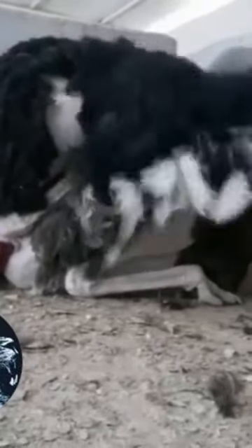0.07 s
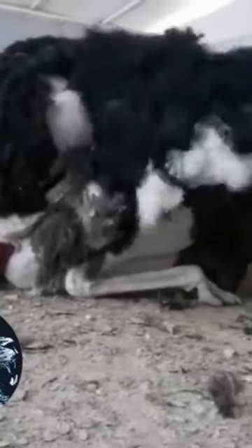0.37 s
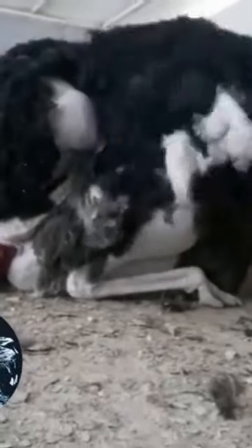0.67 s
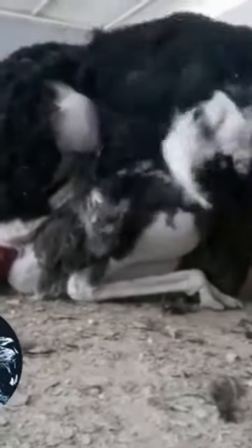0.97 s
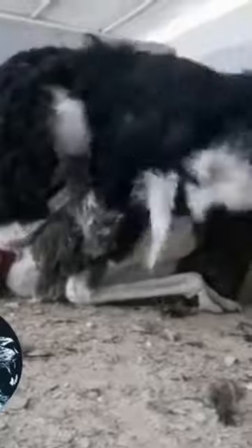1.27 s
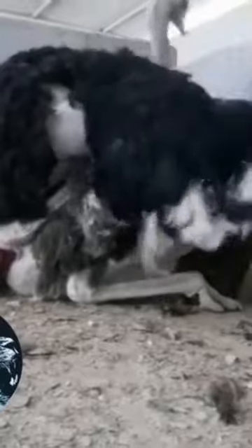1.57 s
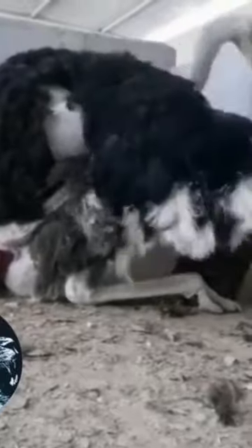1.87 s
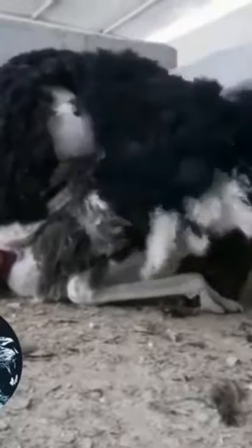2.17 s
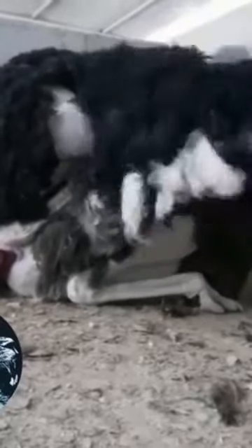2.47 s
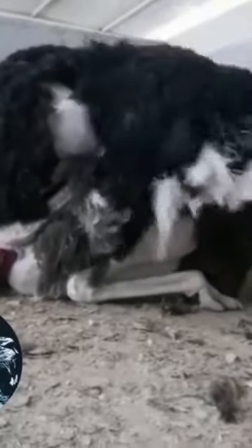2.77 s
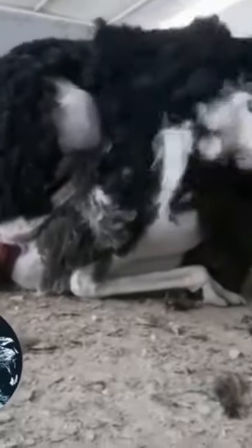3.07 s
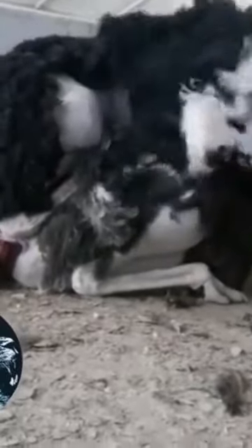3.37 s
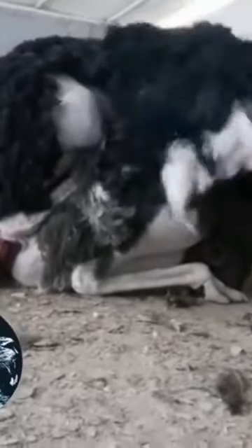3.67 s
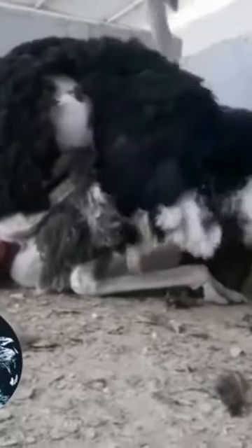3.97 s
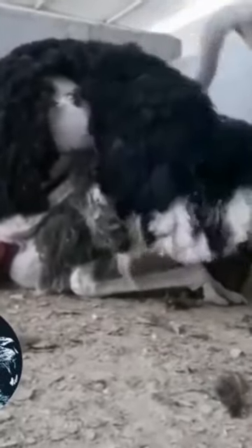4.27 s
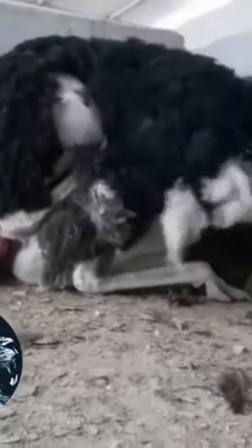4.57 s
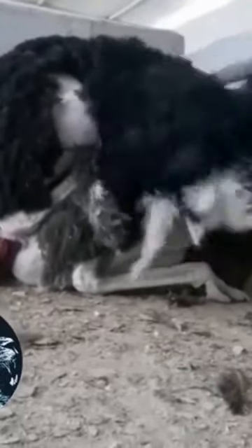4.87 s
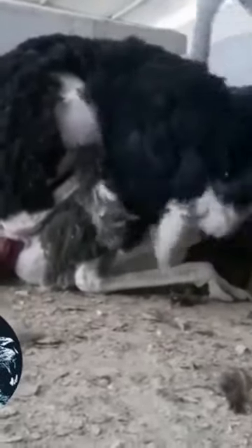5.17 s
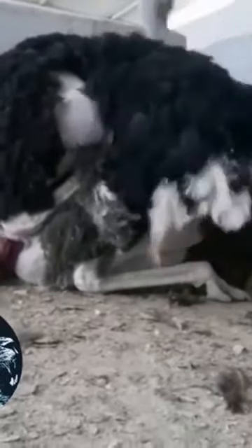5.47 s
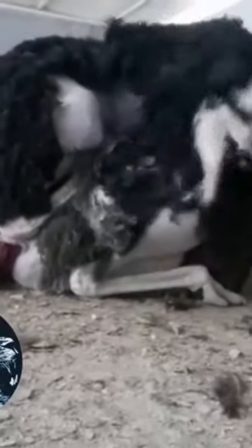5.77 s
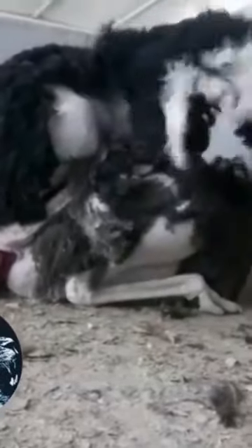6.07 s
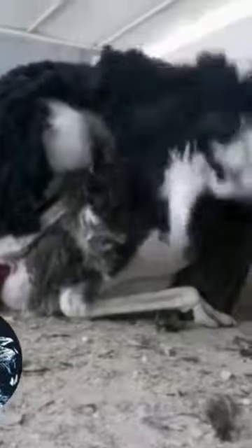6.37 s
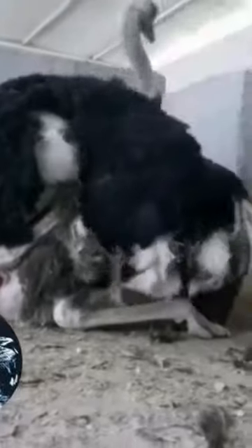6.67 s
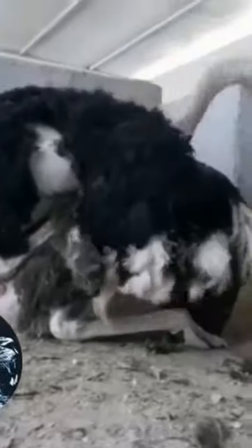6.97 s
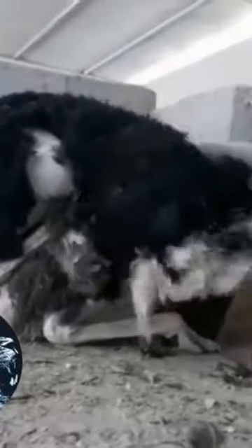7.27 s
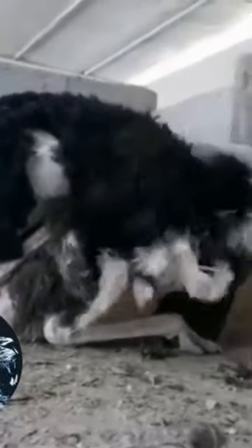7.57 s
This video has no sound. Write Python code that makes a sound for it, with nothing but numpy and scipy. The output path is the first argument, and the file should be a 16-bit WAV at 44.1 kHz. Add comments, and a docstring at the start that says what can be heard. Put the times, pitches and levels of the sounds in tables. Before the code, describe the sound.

A male ostrich roars four times close to the microphone in a quiet covered pen. Each roar is a deep, pulsing boom with wheezy air, and the first three sag in pitch into a rattling groan. Between them the bird draws a thin, hissing breath. Its body bumps the dusty ground, with small stone clacks and faint feather rustle, mostly before the last roar, which is cut short.

```python
"""In a covered pen, on dusty ground, a male ostrich crouches close by and roars four times.
Each roar is a deep pulse tone from the syrinx, radiated by the inflated neck while turbulent air
rushes through the throat; as the pressure falls, the pitch sags and the tone becomes a rattle.
Between roars the bird draws air with a thin hiss. Its body bumps the ground, stones clack and
feathers rustle, and the pen returns short echoes over a quiet background."""
import sys
import numpy as np
from scipy import signal
from scipy.fft import rfft, irfft, next_fast_len
from scipy.io import wavfile
from scipy.ndimage import uniform_filter1d

SR = 44100
rng = np.random.default_rng(int(sys.argv[2]) if len(sys.argv) > 2 else 0)


def put_to_file(sound):
    """Save the sound as 16-bit audio at rate SR, in the file named by the first command-line argument."""
    columns = np.atleast_2d(sound).T  # one column per channel
    safe = np.clip(columns, -1, 1)
    whole_steps = np.round(safe * 32767)
    wavfile.write(sys.argv[1], SR, whole_steps.astype(np.int16))


N = 344862
TIME = np.arange(N) / SR

# Levels are relative: each source adds its own gains.
# course of each roar: t/s, pitch/Hz, fundamental/dB, boom at 100-200 Hz/dB, growl above it/dB
ROARS = [
    [(.02, 64.3, -54, -52.5, -81), (.07, 65.3, -50, -44.5, -40.5), (.12, 77.8, -39, -32, -35.5),
     (.17, 76.8, -39, -26, -31), (.235, 89.5, -28, -24, -29), (.32, 89.7, -29.5, -25.5, -28.5),
     (.375, 84.5, -33.5, -30, -34.5), (.46, 81.3, -40, -31.5, -37), (.52, 80, -45.5, -36.5, -32),
     (.665, 80.14, -49, -30, -31.5), (.725, 76.5, -56, -45.5, -36), (.775, 78.7, -53, -40, -33.5),
     (.815, 80.5, -46, -25, -32.5), (.89, 78.7, -50, -31, -31), (.98, 82.1, -47, -24.5, -35.5),
     (1.14, 82.15, -46.5, -24.5, -35.5), (1.3, 81.5, -45.5, -26.5, -34.5), (1.38, 78.2, -47, -28.5, -34),
     (1.46, 81, -43, -28.5, -32.5), (1.53, 68.16, -53, -34, -44), (1.66, 64.8, -58, -34.5, -38.5),
     (1.73, 60.33, -57, -44, -53.5), (1.79, 56.4, -69, -60.5, -68)],
    [(2.42, 65, -60, -50.5, -63), (2.47, 68.75, -50.5, -49.5, -40.5), (2.53, 77.6, -36.5, -33.5, -35),
     (2.6, 84.5, -35, -24.5, -30.5), (2.71, 84.35, -34.5, -28.5, -32.5), (2.775, 82.3, -36.5, -30.5, -37),
     (2.84, 76, -48.5, -45, -39), (2.92, 77.76, -42, -39, -35.5), (2.98, 79.84, -46, -44, -33.5),
     (3.06, 76.5, -50, -35, -34.5), (3.2, 72.1, -62, -30, -39), (3.29, 71.9, -56, -31.5, -43),
     (3.41, 67.54, -61, -29.5, -40), (3.5, 64.27, -53, -36, -42), (3.6, 63.2, -49, -30, -48.5),
     (3.68, 53.8, -64, -43.5, -47.5), (3.75, 52.44, -61, -39, -61), (3.83, 52.55, -63, -53, -63)],
    [(4.67, 56, -57, -66, -66), (4.73, 60.7, -63, -39.5, -47.5), (4.78, 65, -46, -42, -41.5),
     (4.82, 80.6, -35, -27.5, -31.5), (4.91, 89.5, -27, -23.5, -31.5), (5, 88.26, -29, -25, -31),
     (5.09, 86.9, -30.5, -24.5, -32.5), (5.17, 83.57, -31, -23.5, -30.5),
     (5.28, 84.93, -31.5, -26.5, -32.5), (5.33, 79.75, -38.5, -29, -34), (5.45, 74.57, -39.5, -37.5, -38.5),
     (5.53, 66.5, -55, -40, -41), (5.66, 67.73, -59, -42, -41.5), (5.83, 63.4, -68, -43, -48),
     (5.98, 53.9, -62.5, -38.5, -51.5), (6.04, 48.84, -71, -43.5, -57), (6.15, 47.25, -61, -52, -72.5)],
    [(7.3, 54.9, -69, -47.5, -52), (7.35, 55.86, -60, -41, -53.5), (7.4, 66.9, -46, -46, -43),
     (7.46, 74.7, -38.5, -27.5, -35), (7.51, 78.4, -37, -28.5, -33), (7.58, 83.63, -29.5, -27, -35),
     (7.68, 81.66, -32.5, -25.5, -34), (7.74, 82.6, -30, -25.5, -37), (7.85, 81.45, -37, -25, -34)],
]
# radiation response of the neck for partials 2-5: f/Hz, level/dB
NECK_RESPONSE = [(100, -13.5), (122, -5.5), (140, 0), (165, 2.43), (200, 0.1), (250, 0.5), (290, -2.5),
                 (325, -1), (352, -0.5), (385, -12.5), (410, -20.5), (460, -25)]
# spectral envelope of the higher partials: f/Hz, level/dB
OVERTONE_SPECTRUM = [(300, -12.5), (490, 2.5), (545, 1.5), (605, -7), (690, 3), (770, -3), (840, -12.5),
                     (950, -18), (1060, -7), (1140, -3.5), (1350, -21), (1600, -7.5), (1900, -22),
                     (2200, -16.5)]
# noise of the rattling neck sac: f/Hz, level/dB
SAC_SPECTRUM = [(30, -29), (70, -3.5), (150, 0.5), (250, 1.5), (350, 8.5), (440, -16.5), (620, -28.5),
                (1000, -54)]
# full inflation early in each roar: start/s, duration/s, fourth partial lift/dB, overtone lift/dB
FULL_NECK = [(.159, 0.26, -3, -2), (2.533, 0.51, -3.5, 0), (4.809, 1, -1.5, 0.5), (7.529, .45, -5.5, 5.5)]
# passing resonances of the bending neck: start/s, end/s, centre/Hz, lift/dB
MOANS = [(0.31, 0.442, 767, 15), (0.389, 0.702, 411, 10.5), (0.173, .4, 525, 6.5), (0.483, 0.807, 540, 6),
         (2.576, 2.8, 748, 12.5), (2.548, 2.78, 1090, 5.5), (2.554, 2.777, 1188, 7),
         (2.62, 2.835, 476.5, 16), (2.734, 3.016, 406, 11.5), (2.843, 3.048, 535, 8.5),
         (3.107, 3.361, 364.2, 6.5), (3.15, 3.361, 701.3, 5), (3.417, 3.624, 323.3, 1),
         (4.86, 4.959, 816, 9), (4.851, 5.121, 713, 4.5), (4.947, 5.14, 1130, 6.5),
         (5.091, 5.217, 744.4, 10.5), (5.099, 5.323, 505.8, 2.5), (5.633, 5.92, 316, 12.5),
         (7.529, 7.899, 416, 10.5), (7.424, 7.9, 502.5, 5), (7.551, 7.9, 830, 5.5)]
# wobble of the sac in the first roar: start/s, end/s, rate/Hz, slowing/(Hz/s), depth/1
WOBBLE = (0.81, 1.7, 8.27, 6.1, 0.22)
# air blown out with each roar: t/s, throat level/dB, beak level/dB, wheeze centre/Hz
EXHALATIONS = [
    [(0.0, -53, -62, 1873), (0.034, -47.5, -62, 1761), (0.09, -53, -70, 1834), (0.262, -48.5, -63.5, 1837),
     (0.486, -48.5, -60.5, 1726), (0.658, -45.5, -62.5, 1948), (0.856, -51, -61.5, 1784),
     (0.952, -47.5, -63.5, 2001), (1.018, -51, -69, 1939), (1.044, -51.5, -61.5, 1825),
     (1.556, -50.5, -69, 1772), (1.616, -51, -63.5, 1944), (1.82, -59, -80, 1854)],
    [(2.42, -55, -74, 1830), (2.475, -50.5, -71, 1717), (2.586, -50.5, -64.5, 1788),
     (2.856, -48.5, -64.5, 1698), (2.902, -48, -58.5, 1995), (2.996, -48, -63, 1740),
     (3.102, -48, -63, 2000), (3.242, -46, -63.5, 1805), (3.534, -60.5, -73.5, 1920),
     (3.582, -51, -64.5, 1850), (3.628, -54.5, -71, 1774), (3.82, -67, -75, 1842)],
    [(4.68, -53, -78, 1812), (4.692, -57, -66, 1714), (4.73, -58.5, -82, 1748), (4.814, -50, -65, 1795),
     (5.174, -50.5, -61.5, 1825), (5.23, -53.5, -65.5, 1710), (5.424, -45.5, -62, 1793),
     (5.508, -52, -69.5, 1820), (5.636, -52.5, -69, 1688), (6.098, -61.5, -71, 1829), (6.2, -88, -84, 1960)],
    [(7.33, -73, -58, 1863), (7.38, -56.5, -73, 1848), (7.44, -45.5, -65, 1658), (7.56, -46.5, -64, 1826),
     (7.7, -48, -60.5, 1670), (7.87, -48.5, -60, 1676)],
]
# turbulence in the throat: f/Hz, level/dB
THROAT_SPECTRUM = [(300, -12.5), (520, -0.5), (610, -5), (720, -3.5), (860, -12), (970, -7), (1120, -4.5),
                   (1300, -3.5), (1600, -0.5), (2130, -2), (2400, -7), (3200, -18.5), (4200, -33.5),
                   (7000, -55)]
# hiss at the beak: f/Hz, level/dB
BEAK_SPECTRUM = [(1800, -25.5), (2900, 5), (3700, 3.5), (4500, 8.5), (5300, -0.5), (6500, -7.5),
                 (8000, -15.5), (10000, -33), (13000, -28.5)]
# catches in the throat: start/s, end/s, first centre/Hz, last centre/Hz, level/dB
RASPS = [(.11, .43, 1680, 1600, -54), (.19, .37, 2130, 1975, -52.5), (.56, .72, 1850, 1777, -52.5),
         (.59, .81, 2150, 1910, -52), (.87, 1.01, 2100, 2122, -62), (1.08, 1.43, 1880, 1857, -60.5),
         (1.5, 1.67, 2200, 2105, -58.5), (2.48, 2.62, 1620, 1693, -53.5), (2.59, 2.82, 2130, 2095, -59.5),
         (2.66, 2.77, 1650, 1530, -55), (2.81, 2.93, 1540, 1868, -48.5), (2.87, 2.95, 2050, 2130, -49.5),
         (2.97, 3.05, 1750, 1746, -45.5), (2.99, 3.05, 2080, 2066, -47), (3.07, 3.16, 2120, 2100, -51),
         (3.36, 3.47, 2060, 2078, -58), (4.88, 5.24, 1950, 1896, -57), (5.31, 5.49, 1680, 2044, -58),
         (5.59, 5.74, 1670, 1790, -53), (7.45, 7.6, 1680, 2019, -61), (7.6, 7.82, 1640, 1662, -57.5),
         (7.72, 7.82, 1950, 1850, -53), (7.55, 7.82, 2950, 2870, -63)]
# air drawn in between roars: start/s, end/s, attack/s, hold/s, level/dB, fade/(dB/s)
INHALATIONS = [(1.822, 2.46, 0.071, 0.038, -54, 18), (3.921, 4.7, 0.091, 0.019, -51, 36.5),
               (6.383, 7.08, 0.1, 0.22, -58, 60), (7.225, 7.45, 0.057, .02, -54, 25)]
# noise of the indrawn air: f/Hz, level/dB
INTAKE_SPECTRUM = [(80, -13), (170, -3), (380, 0.5), (560, -15.5), (950, -14.5), (1200, -3), (1450, -1.5),
                   (1850, 0.5), (2100, 3.5), (2450, -19.5), (3050, -9), (3700, -23), (4600, -21),
                   (7000, -56)]
# impacts of body and legs on the ground: t/s, thud level/dB, knock level/dB
BUMPS = [(3.688, -51, -55.5), (3.847, -47, -57), (4.129, -46, -50), (4.376, -53.5, -54.5),
         (4.568, -63, -55.5), (6.337, -52, -63), (6.435, -46, -49), (6.53, -49, -64), (6.682, -55, -61),
         (6.878, -75, -73), (7.298, -37, -48.5)]
# dull push on the soil: f/Hz, level/dB
THUD_SPECTRUM = [(30, -18), (70, -6), (150, 2), (250, 3), (350, 3.5), (440, -15.5), (620, -28), (1000, -53)]
# sandy knock: f/Hz, level/dB
KNOCK_SPECTRUM = [(250, -0.5), (480, 11.5), (750, 8), (1100, -4), (1600, -4), (2600, -9), (5000, -43.5)]
# small stones clacking under the bird: t/s, level/dB
CLACKS = [(4.134, -51), (4.377, -47), (6.249, -38.5), (6.436, -40), (7.299, -39.5)]
# soft, deep thumps: t/s, level/dB, f/Hz
THUMPS = [(6.654, -38.5, 146), (6.71, -39, 92), (6.784, -48, 85), (6.972, -53, 144.1)]
# stiff wing quills scraping: t/s, level/dB, centre/Hz
SCRAPES = [(0.014, -47.5, 2550), (0.6254, -50.5, 3420), (1.045, -56, 4897), (2.8948, -53, 4395),
           (3.2165, -51.5, 2950), (3.5737, -58, 3848), (4.473, -60, 3427), (5.99, -72, 6524),
           (6.14, -66, 2788), (6.243, -67, 3370), (6.371, -63, 2520), (7.256, -65, 4180),
           (7.295, -67, 4467), (7.325, -63, 2906), (7.67, -56, 5000)]
# rustle of the feathers as the bird sways: t/s, level/dB
RUSTLE = [(1.6, -62.5), (2.1, -73), (3, -66.5), (4.3, -66), (6.25, -66), (6.6, -68.5), (7.1, -85),
          (7.35, -62.5)]
# reflections from ground, walls and roof: delay/s, level/dB
ECHOES = [(.0031, -30.5), (.0074, -14), (0.0093, -13), (0.017, -28), (0.024, -16.5), (0.034, -20)]
# quiet air of the pen: f/Hz, level/dB
PEN_SPECTRUM = [(32, -39), (55, -0.5), (125, 5.5), (249, 0.5), (554, -8.5), (712, -8), (959, -12),
                (1230, -9.5), (1510, -16.5), (1740, -10), (2450, -13), (4540, -21), (9230, -32.5),
                (13000, -34.5)]


def roar(scatter_rad=0.3, smear_rad=0.91, rattle_db=-19, slack_rattle_db=18, overtone_db=-26,
         slack_dull_db=3, flutter_db=2, base_sway=0.17, groan_sway=0.28, third_sway=0.36, sway_hz=17):
    """Source and filter: the neck sac radiates the syrinx's harmonics. Returns sound and pulse phase."""
    gate, hz, fundamental_db, boom_db, growl_db = controls(ROARS, fade_s=0.02)
    fourth_db, bright_db = inflation()
    # at low pressure the membranes go slack and beat unevenly
    slack = np.interp(hz, [55, 75], [1, 0])
    # full pressure gives a high pitch and crisp pulses; below it they blur into a groan
    blur = np.interp(uniform_filter1d(hz, SR // 6), [80, 85], [1, 0])
    waver = (.004 + .005 * blur) * walk(26) + .022 * slack * walk(60)
    stumble_rad = (.025 + .03 * blur) * walk(80)
    shimmer_db = .5 + .4 * blur + .6 * slack
    even_phase = 2 * np.pi * np.cumsum(hz * (1 + waver)) / SR
    phase = even_phase + stumble_rad
    wobbling_db = growl_db + wobble()
    boom = undb(fundamental_db + shimmer_db * walk(45)) * np.cos(phase)
    for k in range(2, 6):
        growl_share = np.interp(k * hz, [195, 222], [0, 1])
        drive_db = (1 - growl_share) * boom_db + growl_share * wobbling_db
        db = drive_db + colour_db(NECK_RESPONSE, k * hz) + moans(k * hz) + (k == 4) * fourth_db
        # the skin of the sac trembles, so each partial sways in strength and phase, the third most
        depth = base_sway + (third_sway if k == 3 else groan_sway) * (slack if k == 2 else np.sqrt(blur))
        sway = (1 + depth * (walk(sway_hz) + 1j * walk(sway_hz))) / np.sqrt(1 + 2 * depth ** 2)
        # the sac rings on after each pulse, which spreads the partials in time
        lag_rad = np.interp(k * hz, [170, 350], [0, .9]) + smear_rad * blur * (k - 3) ** 2
        partial = np.real(sway * np.exp(1j * (k * phase - lag_rad)))
        boom += undb(db + shimmer_db * np.sqrt(k / 2) * walk(45)) * partial
    buzz = np.zeros(N)
    for k in range(6, 24):
        db = colour_db(OVERTONE_SPECTRUM, k * hz) + moans(k * hz) + flutter_db * walk(12)
        buzz += undb(db) * np.cos(k * even_phase + rng.uniform(0, 2 * np.pi) + scatter_rad * walk(35))
    buzz *= undb(growl_db + overtone_db + bright_db - slack_dull_db * slack)
    # flapping membranes rattle the sac in ragged bursts
    bursts = undb(slack_rattle_db * slack) * (1 + .6 * np.cos(phase))
    rattle = undb(growl_db + rattle_db) * bursts * noise(SAC_SPECTRUM)
    return gate * (np.sqrt(2) * (boom + buzz) + rattle), phase


def inflation(inflate_s=0.023):
    """Radiation efficiency: the full neck shifts the levels of the fourth partial and overtones, in dB."""
    lifts = sum(np.outer(dbs, (TIME > s) & (TIME < s + length_s)) for s, length_s, *dbs in FULL_NECK)
    return uniform_filter1d(lifts, int(inflate_s * SR), axis=1)


def moans(hz, width_hz=42, ease_s=.05):
    """Resonance: the lift in dB that makes a partial moan as it meets a mode of the bending neck."""
    lift = np.zeros(N)
    for start_s, end_s, centre_hz, db in MOANS:
        now = slice(int(start_s * SR), int(end_s * SR))
        held = np.clip(np.minimum(TIME[now] - start_s, end_s - TIME[now]) / ease_s, 0, 1)
        lift[now] += db * held * np.exp(-((hz[now] - centre_hz) / width_hz) ** 2)
    return lift


def wobble():
    """Beating: the wobbling sac gives the growl ever slower swells and dips, in dB."""
    start_s, end_s, rate_hz, slowing_hz_per_s, depth = WOBBLE
    t = TIME - start_s
    beat = abs(1 + depth * np.exp(2j * np.pi * (rate_hz - slowing_hz_per_s * t / 2) * t))
    gate = uniform_filter1d(1. * ((TIME > start_s) & (TIME < end_s)), SR // 20)
    return 20 * np.log10(beat) * gate


def blown_air(phase, throb=0.19, whistle_hz=4400, flicker_db=1.47, gust_db=0.76):
    """Turbulence, pulsed by the syrinx, excites drifting resonances in the throat and at the beak."""
    gate, throat_db, beak_db, wheeze_hz = controls(EXHALATIONS, fade_s=0.12)
    throat = undb(-3) * noise(THROAT_SPECTRUM)
    throat += undb(-12) * resonance(wheeze_hz * (1 + .045 * walk(14)), width_hz=170)
    beak = noise(BEAK_SPECTRUM)
    beak += undb(-8) * resonance(whistle_hz * (1 + .047 * walk(5.3)), width_hz=260)
    throat *= undb(throat_db + flicker_db * walk(40))
    beak *= undb(beak_db + flicker_db * walk(45))
    return gate * undb(gust_db * walk(15)) * (1 + throb * np.cos(phase)) * (throat + beak)


def rasps(phase, width_hz=110, ease_s=0.027, throb=0.5, gain_db=-1):
    """Amplitude modulation: the syrinx chops a narrow, gliding resonance where the throat catches."""
    out, ring = np.zeros(N), ringing(width_hz)
    for row, (start_s, end_s, first_hz, last_hz, db) in enumerate(RASPS):
        t = TIME[(TIME > start_s) & (TIME < end_s)]
        hz = np.interp(t, [start_s, end_s], [first_hz, last_hz])
        held = np.clip(np.minimum(t - start_s, end_s - t) / ease_s, 0, 1)
        amplitude = np.roll(ring, row * SR // 3)[:len(t)]
        band = unit(np.real(amplitude * np.exp(2j * np.pi * np.cumsum(hz) / SR)))
        add(out, start_s, undb(db + gain_db) * held * band)
    return out * (1 + throb * np.cos(phase))


def drawn_air(glottis_hz=1870, release_s=0.17, flicker_db=2.0):
    """Flow through a constriction: the narrow glottis hisses as the bird refills."""
    air = undb(-2) * noise(INTAKE_SPECTRUM) + undb(-7) * resonance(glottis_hz, width_hz=260)
    flow = np.zeros(N)
    for start_s, end_s, attack_s, hold_s, db, fade_db_per_s in INHALATIONS:
        opening = np.clip((TIME - start_s) / attack_s, 0, 1) * np.clip((end_s - TIME) / release_s, 0, 1)
        fading_s = np.maximum(TIME - start_s - attack_s - hold_s, 0)
        flow += opening * undb(db - fade_db_per_s * fading_s)
    return flow * undb(flicker_db * walk(30)) * air


def bumps(rise_s=0.0008, knock_decay_s=0.036, thud_gain_db=-1, knock_gain_db=2):
    """Impact noise: each contact with the ground gives a dull thud and a shorter, sandy knock."""
    out, t = np.zeros(N), TIME[:SR // 4]
    fade = np.exp(-t / knock_decay_s)
    for s, thud_db, knock_db in BUMPS:
        thud = undb(thud_db + thud_gain_db) * fade ** 0.61 * noise(THUD_SPECTRUM, len(t))
        knock = undb(knock_db + knock_gain_db) * fade * noise(KNOCK_SPECTRUM, len(t))
        add(out, s, (1 - np.exp(-t / rise_s)) * (thud + knock))
    return out


def clacks(stone_hz=880, swell_s=0.00033, gain_db=1):
    """Heavy damping: a stone bedded in dust rings for barely a cycle."""
    out, t = np.zeros(N), TIME[:SR // 50]
    for s, db in CLACKS:
        add(out, s, undb(db + gain_db) * pulse(t, swell_s) ** 2 * np.sin(2 * np.pi * stone_hz * t))
    return out


def thumps(swell_s=0.0062):
    """Damped oscillation: a soft push swings for only two or three cycles."""
    out, t = np.zeros(N), TIME[:SR // 8]
    for s, db, hz in THUMPS:
        add(out, s, undb(db) * pulse(t, swell_s) ** 2 * np.sin(2 * np.pi * hz * t))
    return out


def scrapes(swell_s=0.0081, gain_db=-2):
    """Sliding friction: a quill rubs its neighbours in a short swell of hiss around one pitch."""
    out, t = np.zeros(N), TIME[:SR // 6]
    for s, db, hz in SCRAPES:
        quill = noise([(hz / 2, -32), (hz * 0.7, -16), (hz, 0), (hz * 1.22, -16), (hz * 2, -48)], len(t))
        add(out, s, undb(db + gain_db) * pulse(t, swell_s) * quill)
    return out


def feathers(contacts_per_s=110, rise_s=.002, decay_s=0.0082):
    """Shot noise: random contacts between quills add up to a grainy rustle."""
    contacts = 1. * (rng.random(N) < contacts_per_s / SR)
    t = TIME[:SR // 10]
    grains = signal.fftconvolve(contacts, (1 - np.exp(-t / rise_s)) * np.exp(-t / decay_s))[:N]
    friction = noise([(600, -13.5), (1500, 4.5), (4500, -6.5), (7000, -23.5), (13000, -29.5)])
    return undb(np.interp(TIME, *np.transpose(RUSTLE))) * unit(grains * friction)


def reflect(x, above_hz=1300, t60_s=1.0, tail_db=-23, tail_delay_s=.012):
    """Reflection and reverberation: nearby boards return the shorter waves; the pen rings faintly."""
    bright = signal.sosfilt(signal.butter(4, above_hz, "high", fs=SR, output="sos"), x)
    out = x.copy()
    for delay_s, db in ECHOES:
        add(out, delay_s, undb(db) * bright)
    t = TIME[:SR // 2]
    tail = rng.standard_normal(len(t)) * np.exp(-np.log(1000) * t / t60_s)
    add(out, tail_delay_s, undb(tail_db) * signal.fftconvolve(x, tail / np.linalg.norm(tail)))
    return out


def pen_air(level_db=-62, drift_db=0.42):
    """Ambient noise: a low, broad hush whose level drifts slightly."""
    return undb(level_db + drift_db * walk(3.8)) * noise(PEN_SPECTRUM)


def resonance(hz, width_hz):
    """Narrow-band noise of rms 1 in one resonance whose centre may move."""
    return unit(np.real(ringing(width_hz) * np.exp(2j * np.pi * np.cumsum(hz * np.ones(N)) / SR)))


def ringing(width_hz):
    """Complex envelope: the wandering strength and phase of a resonance driven by noise."""
    stir = rng.standard_normal(N) + 1j * rng.standard_normal(N)
    return signal.sosfilt(signal.butter(2, width_hz / 2, fs=SR, output="sos"), stir)


def noise(points, size=N):
    """Spectral shaping: noise of rms 1 with the given spectrum."""
    n = next_fast_len(size)
    gain = undb(colour_db(points, np.fft.rfftfreq(n, 1 / SR)))
    return unit(irfft(rfft(rng.standard_normal(n)) * gain, n)[:size])


def colour_db(points, hz):
    """Level of a spectrum at hz, interpolated on a log-frequency axis."""
    f, db = np.transpose(points)
    return np.interp(np.log(hz + 1e-3), np.log(f), db)


def walk(rate_hz):
    """Random modulation of rms 1, gliding to a new value rate_hz times a second."""
    levels = rng.standard_normal(4096)
    return unit(np.interp(TIME * rate_hz, np.arange(len(levels)), levels))


def controls(tables, fade_s):
    """Envelopes: a gate that is open while the tables last, then each of their columns as a curve."""
    s, *columns = np.vstack(tables).T
    gate = sum(1. * ((TIME >= rows[0][0]) & (TIME <= rows[-1][0])) for rows in tables)
    return [uniform_filter1d(gate, int(fade_s * SR))] + [np.interp(TIME, s, c) for c in columns]


def pulse(t, peak_s):
    """Critically damped envelope that reaches 1 at peak_s."""
    return t / peak_s * np.exp(1 - t / peak_s)


def add(out, s, sound):
    """Superpose a sound on out from time s."""
    start = max(int(s * SR), 0)
    out[start:start + len(sound)] += sound[:N - start]


def undb(db):
    """Decibels to amplitude ratio."""
    return np.exp(np.asarray(db) * (np.log(10) / 20))


def unit(x):
    """Normalise to rms 1."""
    return x / np.sqrt(np.mean(x ** 2))


def scene():
    """Superposition: the bird and its echoes over the quiet air of the pen."""
    voice, phase = roar()
    breath = blown_air(phase) + rasps(phase) + drawn_air()
    movement = bumps() + clacks() + thumps() + scrapes() + feathers()
    return (reflect(voice + breath + movement) + pen_air())[None]


def record(dry, low_cut_hz=24, top_hz=13150, fade_s=.004):
    """Band limiting: the phone thins the deepest bass and cuts the top treble; a fade ends the sound."""
    thinned = signal.sosfilt(signal.butter(2, low_cut_hz, "high", fs=SR, output="sos"), dry)
    closing = np.minimum((TIME[-1] - TIME) / fade_s, 1)
    return signal.sosfilt(signal.ellip(10, .2, 70, top_hz, fs=SR, output="sos"), thinned * closing)


dry = scene()
out = record(dry)
put_to_file(out)
```